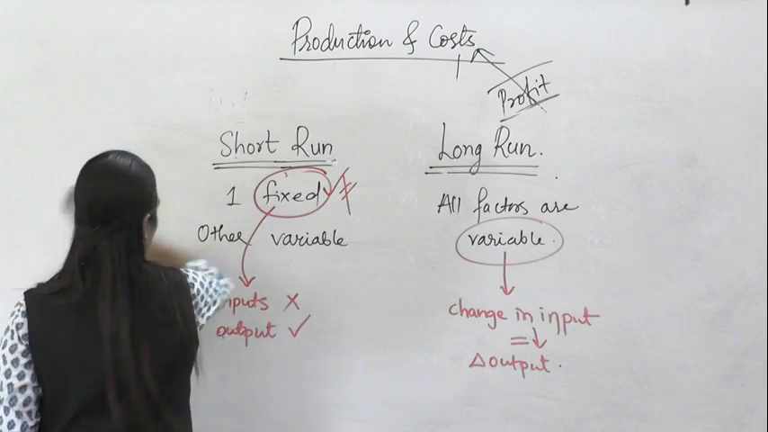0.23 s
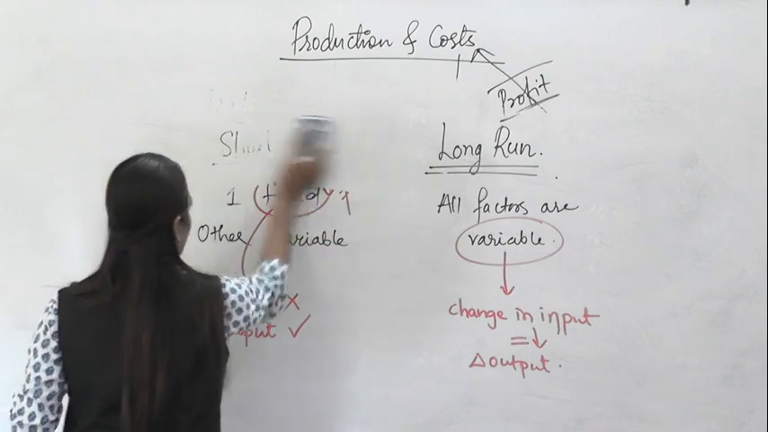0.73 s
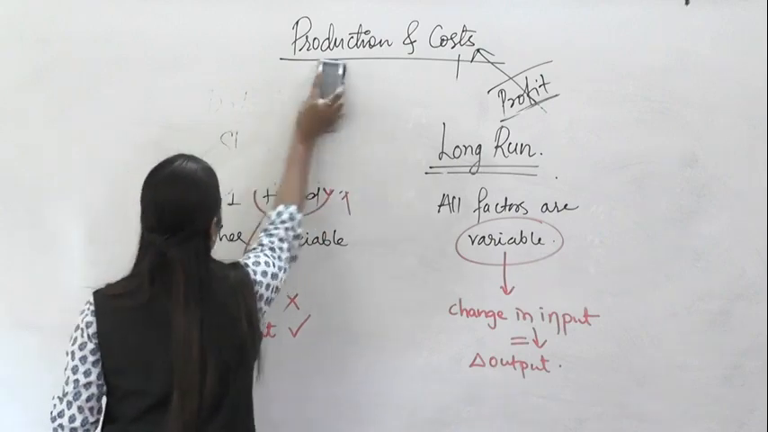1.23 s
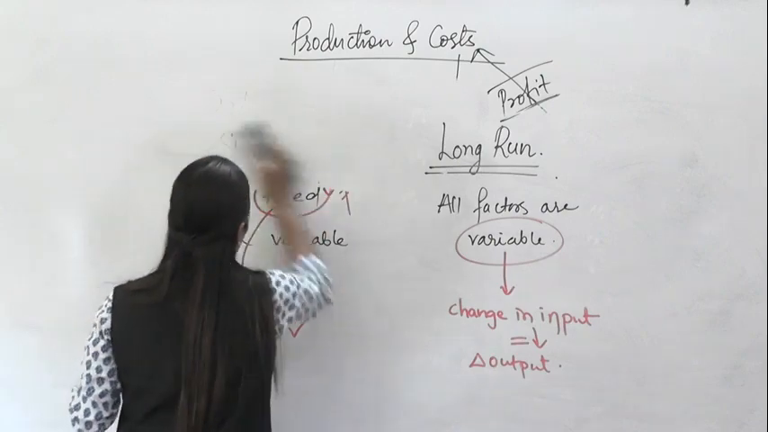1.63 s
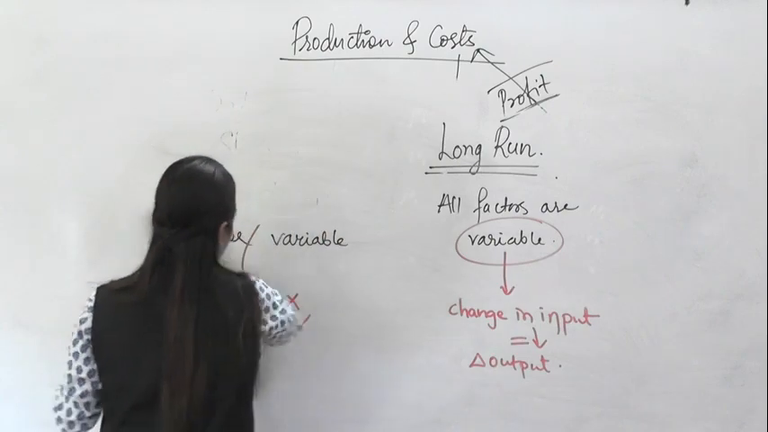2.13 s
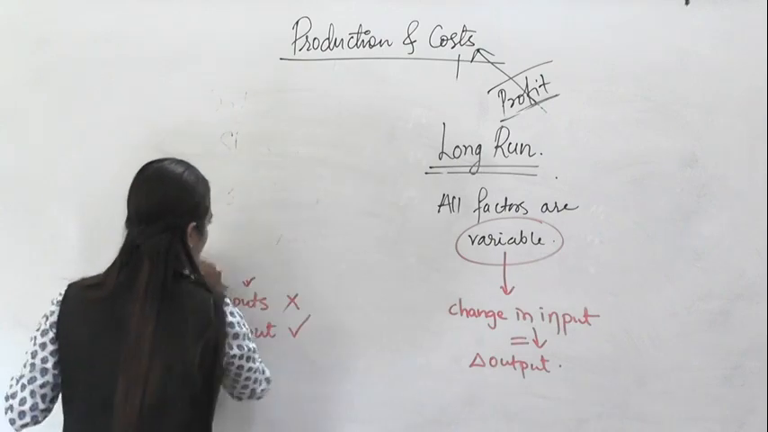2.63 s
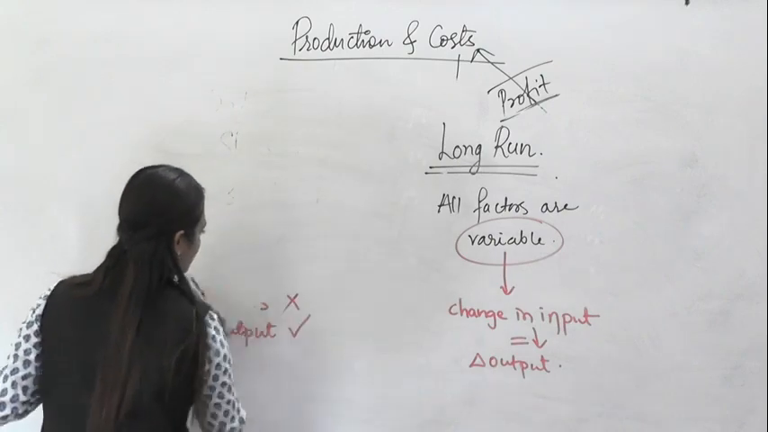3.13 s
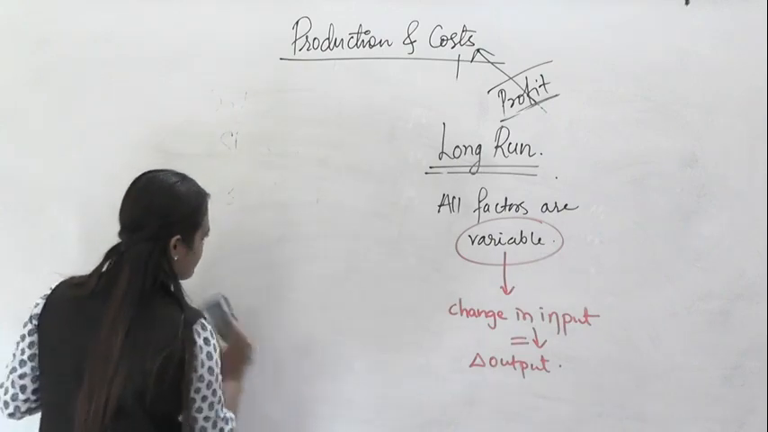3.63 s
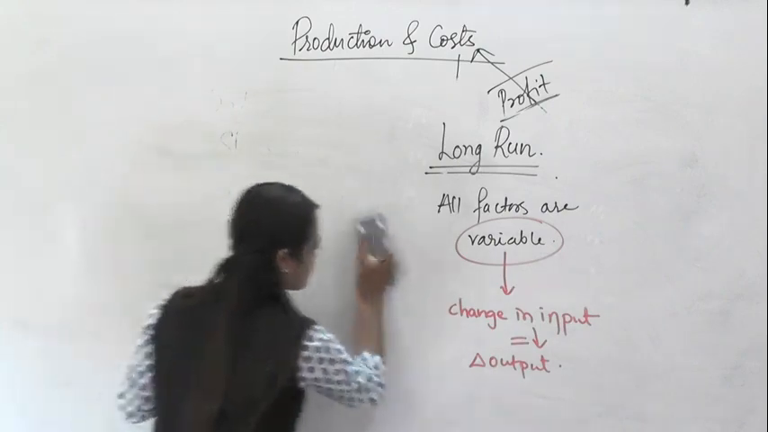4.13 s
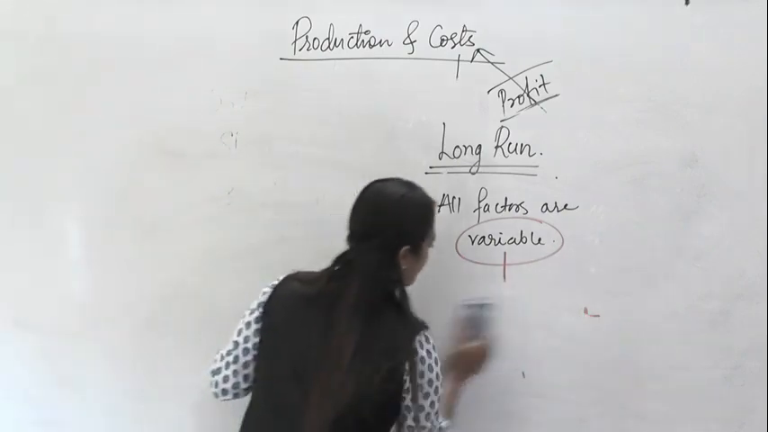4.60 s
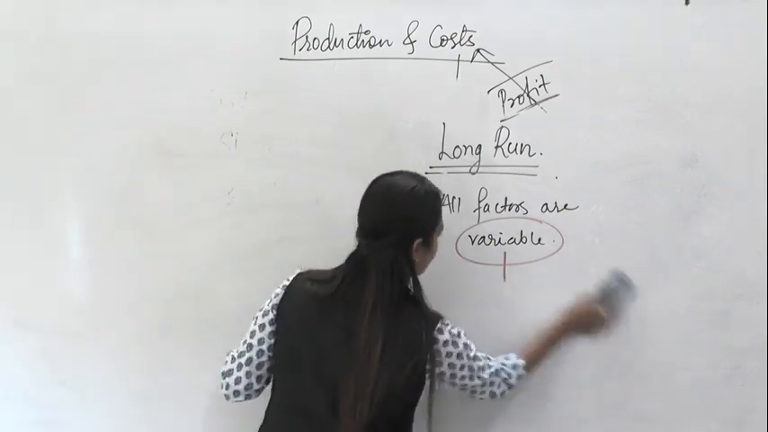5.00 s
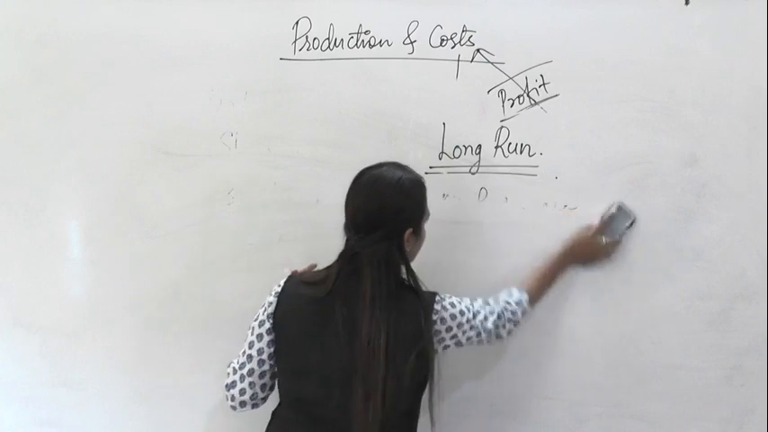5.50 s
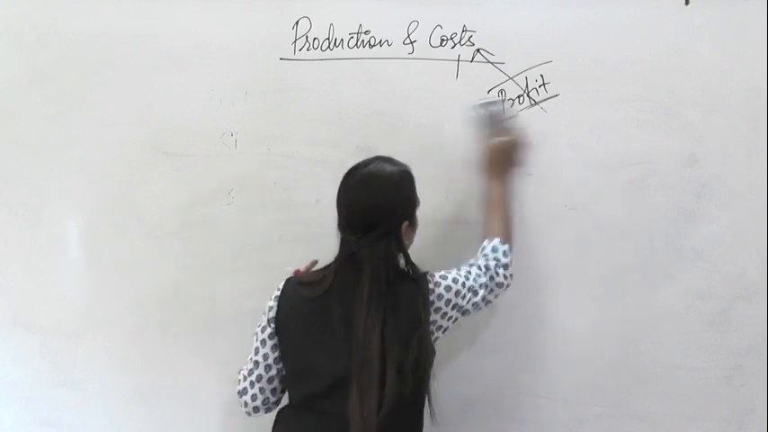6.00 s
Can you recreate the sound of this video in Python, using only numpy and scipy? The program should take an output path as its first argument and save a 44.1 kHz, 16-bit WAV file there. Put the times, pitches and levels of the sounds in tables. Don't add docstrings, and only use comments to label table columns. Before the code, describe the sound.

A felt duster rubs a whiteboard in rapid dry swishes, roughly four per second, some sharp and loud, others soft. A hard tick comes early on, then the strongest wipe near two seconds. Later strokes are lighter and more hollow. Clothing rustles and rumbles against a clip-on microphone, with soft bumps, in a quiet classroom with faint hum. The sound sits in the left channel, with a dull trace on the right.

```python
import sys
import numpy as np
from scipy import signal
from scipy.fft import rfft, irfft, next_fast_len
from scipy.io import wavfile
from scipy.ndimage import uniform_filter1d, map_coordinates

SR = 44100
rng = np.random.default_rng(int(sys.argv[2]) if len(sys.argv) > 2 else 0)


def wav_record(signal):
    frames = np.transpose(np.atleast_2d(signal))
    bounded = np.clip(frames, -1, 1)
    quanta = np.round(bounded * 32767).astype(np.int16)
    wavfile.write(sys.argv[1], SR, quanta)


def boost_factor(decibels):
    exponent = np.asarray(decibels, float) / 20
    return 10 ** exponent


N = 275713
FRAME = 256


def unit(x):
    return x / np.sqrt(np.mean(x ** 2) + 1e-20)


def along(points, hz):
    point_hz, value = np.transpose(points)
    return np.interp(np.log(hz + 1), np.log(point_hz + 1), value)


def wobble(rate):
    knots = rng.standard_normal(int(N * rate / SR) + 4)
    return map_coordinates(knots, [np.arange(N) * rate / SR])


def filtered(x, response):
    size = next_fast_len(N + 8192)
    spectrum = rfft(x, size) * response(np.fft.rfftfreq(size, 1 / SR))
    return irfft(spectrum, size)[..., :N]


def noise(spectrum):
    return unit(filtered(rng.standard_normal(N), lambda hz: boost_factor(along(spectrum, hz))))


def hump(hz, centre, width, steep):
    distance = np.abs(np.log((hz + 1) / centre) * centre / width * 2)
    power = boost_factor(-12 * distance ** steep)
    return power / power.mean(axis=0)


# fastest moment in seconds, speeding up in seconds, slowing down in seconds,
# felt hiss level in dB, centre of the felt hiss in Hz.
STROKES = [(0.012, 0.12, 0.158, -36, 5450), (0.259, 0.089, 0.25, -39, 5160), (0.499, 0.33, 0.2, -35, 5460),
           (0.906, 0.11, 0.11, -32.5, 5940), (1.161, 0.29, 0.12, -38.5, 5970),
           (1.43, 0.049, 0.12, -28.5, 5500), (1.727, 0.48, 0.15, -40.5, 5660),
           (2.039, 0.1, 0.13, -23, 5140), (2.334, 0.24, 0.15, -41.5, 5500),
           (2.652, 0.11, 0.083, -33.5, 5340), (2.872, 0.14, 0.14, -41.5, 5100),
           (3.155, 0.086, 0.11, -35.5, 5200), (3.379, 0.17, 0.1, -47, 7350),
           (3.622, 0.076, 0.075, -41, 6300), (3.851, 0.18, 0.15, -43.5, 7800),
           (3.957, 0.48, 0.19, -69, 7000), (4.363, 0.13, 0.16, -39.5, 5800),
           (4.587, 0.062, 0.24, -34.5, 5600), (4.688, 0.13, 0.051, -37, 5940),
           (4.864, 0.094, 0.13, -33.5, 6150), (5.211, 0.21, 0.091, -39.5, 6100),
           (5.492, 0.17, 0.15, -45.5, 6900), (5.778, 0.15, 0.11, -40.5, 5400),
           (5.964, 0.055, 0.25, -47.5, 5340)]


def swing(t, follows):
    fastest, rise, fall = np.transpose(STROKES)[:3, :, None]
    away = np.where(t < fastest, (fastest - t) / rise, (t - fastest) / fall)
    loss_db = 15.5 * away ** 1.4 + 7 * away ** 2.77
    return boost_factor(-2 * follows * loss_db)


# moment in seconds, hold in seconds (negative = a sudden
# stop instead), change in dB while held back.
GRIPS = [(1.413, .015, -7), (3.099, .035, -9), (4.562, .05, -12), (5.95, .06, -10), (3.568, .04, -3),
         (.215, .05, -3), (.82, .05, -4), (1.948, .05, -4), (2.008, .04, -4), (2.585, .05, -6),
         (5.165, .08, -5), (.645, -.06, -4), (.965, -.04, -3), (2.083, -.06, -5), (2.445, -.07, -5),
         (2.96, -.07, -5), (3.216, -.04, -5), (4.08, -.06, -5), (4.72, -.05, -4), (5.275, -.05, -4),
         (6.15, -.06, -5)]


def grip(hz, t):
    change_db = np.zeros(len(t))
    for s, length, db in GRIPS:
        ahead = (s - t) / length
        change_db += db * np.clip(1 - ahead, 0, 1) * (ahead > 0)
    return change_db * np.clip(hz / 4500, .55, 1.25)


# middle in seconds, half length in seconds,
# centre in Hz, half width in Hz, change in dB.
BAND_SHIFTS = [(.47, 0.13, 1700, 300, 5), (.71, 0.067, 3056, 700, -2), (2.04, .07, 1500, 400, 0),
               (3.195, .03, 2360, 450, 7), (3.302, 0.068, 3970, 560, -20), (3.725, 0.054, 2320, 600, -8),
               (3.76, 0.13, 4300, 460, -16), (3.94, 0.073, 4150, 400, -6), (4.08, 0.075, 6200, 900, -11),
               (4.136, 0.13, 2290, 547, -10), (4.28, 0.044, 10800, 2500, 8), (4.597, 0.29, 1010, 201, -11),
               (4.804, 0.065, 10200, 900, -8), (4.87, .07, 3100, 280, -8), (4.876, 0.086, 9600, 905, -13),
               (5.04, 0.059, 2050, 516, -27), (5.087, 0.072, 10300, 3000, -13.5),
               (5.385, 0.088, 2220, 500, -13.5), (5.492, 0.05, 2510, 350, 6.5), (5.57, 0.071, 9900, 2060, -17),
               (5.61, 0.082, 1980, 463, -17), (5.893, 0.037, 1300, 450, -4), (6.003, 0.068, 1400, 400, 6.5)]


def band_shift(hz, t):
    change_db = np.zeros((len(hz), len(t)))
    for s, length, band_hz, width, db in BAND_SHIFTS:
        change_db += db * np.exp(-((t - s) / length) ** 4 - ((hz - band_hz) / width) ** 2)
    return change_db


# hollow, edge, board and fine fibres, all in dB
# over the felt, then the arm's echo in dB.
HOLDS = [(-6.5, 0.5, -15.5, -17.9, -0.5), (-8, -8.5, -30, -17.0, 4), (-5, -15, -12.5, -12, 2),
         (-0.5, -8, -12, -17, -10.5), (-9, -12.5, -6, -12, 7.5), (-3, -6.1, -13.5, -17, 2.5),
         (-7, -9.5, -3.5, -11.5, 9.3), (-6.5, -1.9, -17.5, -17.5, 7), (0.5, -3, -3.3, -6, 3),
         (5, -3.5, -10, -13.1, -1.5), (1.5, -6, -2.5, -7.5, 2), (9.5, -6, -7.5, -8.5, -9),
         (8, 4.2, 4, -0.8, 0), (12.5, -14, 3, -4.5, -10.5), (5, -13, -3.5, -3.7, -21),
         (29.5, 13.8, 20.5, -11, 0.6), (-1.5, -9, -2, -8, -2.5), (-5, -10, -10, -16, -4),
         (12, -9, 6.5, -19, -8.5), (1, -18, -6, -11.5, -11.5), (0, -1.2, -5.5, -6.5, -1),
         (3.8, 3, 4.3, -5.5, -2.7), (-7, -6.5, -19, -12.5, 5.7), (-7.5, -0.5, -2.5, -10, 5)]
# frequency in Hz, level in dB per Hz.
FIBRES = [(5000, -48), (7500, -3), (9500, -2.5), (11500, -8.5), (13500, -12.5), (15500, -18)]


def duster():
    grains_db = 1.1 * wobble(400) + .8 * wobble(70)
    scrape = unit(rng.standard_normal(N) * boost_factor(grains_db))
    hz, t, z = signal.stft(scrape, SR, nperseg=FRAME)
    hz = hz[:, None]
    felt_db, felt_hz = np.transpose(STROKES)[3:]
    hollow_db, edge_db, board_db, fibre_db, echo_db = np.transpose(HOLDS)
    echo = boost_factor(2 * echo_db * np.exp(-((hz - 3010) / 530) ** 2))

    def layer(db, colour, follows):
        return (boost_factor(2 * (felt_db + db)) * colour * echo) @ swing(t, follows)

    def uneven(db, rate):
        return boost_factor(2 * db * np.interp(t, np.arange(N) / SR, wobble(rate)))

    felt = hump(hz, felt_hz, 0.63 * felt_hz, steep=2.01)
    fine = boost_factor(2 * along(FIBRES, hz))
    board = hump(hz, 1350, 750, steep=1.74)
    hollow = hump(hz, 2280, 800, steep=1.07)
    edge = hump(hz, 3750, 1500, steep=1.35)
    board_rest = boost_factor(2 * -46) * board

    power = layer(6.25, felt, 0.96)
    power += layer(fibre_db + 7.5, fine / fine.mean(), 1.12)
    power += (layer(board_db + 5.5, board, 0.38) + board_rest) * uneven(2, 22)
    power += layer(hollow_db + 6.0, hollow, 0.73) * uneven(1.5, 35)
    power += layer(edge_db + 5.8, edge, 0.78)

    patches = uniform_filter1d(rng.standard_normal(z.shape), 3, axis=0)
    patches = uniform_filter1d(patches, 28, axis=1)
    colour_db = 2.1 * unit(patches) + grip(hz, t) + band_shift(hz, t)
    return signal.istft(z * np.sqrt(power) * boost_factor(colour_db), SR, nperseg=FRAME)[1][:N]


# start in seconds, peak level in dB, centre in Hz,
# width as a share of the centre, time to fall by 60 dB in seconds.
TICKS = [(.545, -24, 4500, 1.8, .003), (.8555, -30, 5000, 1.2, .004), (1.0211, -33, 5000, 1.2, .004),
         (1.4128, -9, 3800, 1.1, .0013), (1.9128, -29, 5400, .3, .006), (3.0995, -22, 2100, .5, .016),
         (3.2675, -26, 2000, .8, .02), (4.519, -29, 2000, .9, .008), (1.9315, -30, 900, .9, .04),
         (5.951, -28, 2000, 1.8, .012), (1.5693, -26, 5000, 1.2, .003), (1.587, -30, 4000, 1.2, .003),
         (2.121, -33, 1300, .4, .06), (2.5, -36, 950, .8, .04), (3.96, -36, 5000, 1.8, .004),
         (4.564, -24, 2200, 1.2, .012), (5.465, -33, 2400, .3, .015), (5.541, -31, 1200, .5, .012),
         (5.572, -35, 3350, .08, .018)]


def ticks():
    out = np.zeros(N + SR)
    t = np.arange(SR // 40) / SR
    for s, db, hz, width, t60 in TICKS:
        crack = boost_factor(-60 * t / t60) * (rng.standard_normal(len(t)) + 4 * (t == 0))
        pole = np.clip(np.exp(-np.pi * hz * width / SR), 0, .99)
        poles = [1, -2 * pole * np.cos(2 * np.pi * hz / SR), pole ** 2]
        ring = signal.sosfilt([[1, -1.09, 0.13, *poles], [1, -0.92, 0.29, *poles]], crack)
        out[round(s * SR):][:len(t)] += boost_factor(db + 6) * ring / np.abs(ring).max()
    return out[:N]


# time in seconds, rustle level in dB.
CLOTH = [(0, -48.5), (.45, -58.5), (1.3, -55.5), (2.3, -57.5), (4.0, -54.5), (4.22, -48), (5.5, -49),
         (6.25, -56)]
# middle in seconds, half length in seconds, rustle rise in dB,
# rumble rise in dB.
TUGS = [(0.05, 0.12, -5, 15), (0.71, 0.12, 1, 7), (1.25, 0.11, 3, 15), (1.455, 0.078, 7, 12.5),
        (1.944, 0.052, 10.5, 18.5), (3.58, 0.054, 0, -3), (4.33, 0.12, 2, 0), (4.54, 0.035, 0.5, 10),
        (4.719, 0.069, 6.5, 1), (5.55, 0.077, 3.5, 18), (5.97, 0.025, 6, -5), (6.12, 0.046, 5, 8)]
# frequency in Hz, level in dB per Hz.
RUSTLE = [(60, -8), (140, -4), (220, 1), (500, -0.5), (900, -1.5), (1800, -20.5), (4000, -12), (7000, -49),
          (12000, -70)]
# frequency in Hz, level in dB per Hz.
RUMBLE = [(10, -8.5), (30, -2), (60, -7), (110, 0), (160, -12), (300, -47)]


def cloth():
    t = np.arange(N) / SR
    s, length, *rises_db = np.transpose(TUGS)
    tugs = np.exp(-((t - s[:, None]) / length[:, None]) ** 2)
    rustle_rise_db, rumble_rise_db = np.array(rises_db) @ tugs
    pull_db = np.interp(t, *np.transpose(CLOTH))
    rustle = unit(noise(RUSTLE) * boost_factor(1.4 * wobble(25)))
    rumble = unit(noise(RUMBLE) * boost_factor(2.5 * wobble(12)))
    return boost_factor(pull_db + rustle_rise_db + 5.5) * rustle + boost_factor(-62.5 + rumble_rise_db) * rumble


# start in seconds, peak level in dB,
# push length in seconds (negative = pull first).
BUMPS = [
    (1.299, -30.5, -.0046),
    (1.9312, -29, .0007),
    (1.934, -43, -.007),
    (4.203, -40, -.004),
    (4.339, -39, -.004),
    (5.532, -38, -.003),
    (6.073, -42, -.0045),
]


def bumps():
    t = np.arange(N) / SR
    pushes = np.zeros(N)
    for s, db, length in BUMPS:
        u = np.clip((t - s) / abs(length), 0, 12)
        pushes += np.sign(length) * boost_factor(db + 9) * np.sin(2.4 * u) * u * np.exp(-.9 * u)
    return pushes


# frequency in Hz, time to fall by 60 dB in seconds.
ROOM = [(300, 0.15), (2000, 1), (6000, 0.99), (14000, 0.073)]


def room(x):
    hz, t, z = signal.stft(rng.standard_normal(SR // 2), SR, nperseg=FRAME)
    fade = boost_factor(-60 * t / along(ROOM, hz)[:, None])
    tail = signal.istft(z * fade, SR, nperseg=FRAME)[1]
    late = np.pad(x, (300, 0))
    return signal.fftconvolve(late, tail / np.linalg.norm(tail))[:N]


def hum():
    level = boost_factor(-63.5 + 3 * wobble(9))
    hz = 222 + 14 * wobble(13)
    return level * np.sin(2 * np.pi * np.cumsum(hz) / SR)


def scene():
    wiping = duster() + ticks()
    microphone = wiping + boost_factor(-23) * room(wiping) + cloth() + bumps() + hum()
    return np.array([microphone, np.zeros(N)])


# frequency in Hz, level in dB per Hz.
HISS = [(30, 4), (400, 0), (7000, -3), (15000, -7)]


def idle_channel(left):
    def leak(hz):
        lag = np.exp(-2j * np.pi * hz * 1.2 / SR)
        return lag / (1 + 1j * hz / 205) / (1 + 1j * hz / 5500)

    return boost_factor(-27.5) * filtered(left, leak) + boost_factor(-80) * noise(HISS)


def top_cut(x):
    return signal.sosfilt(signal.butter(12, 15870, fs=SR, output="sos"), x)


def record(dry):
    left = dry[0] / (1 + np.abs(dry[0] / .99) ** 12) ** (1 / 12)
    right = idle_channel(left)
    mix = filtered(np.array([left, right]), lambda hz: hz < 15850)
    return top_cut(mix)


dry = scene()
out = record(dry)
wav_record(out)
```